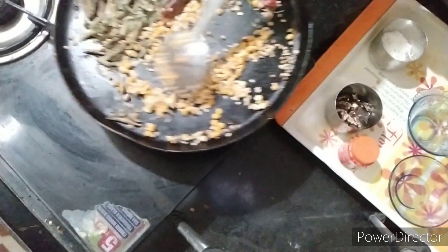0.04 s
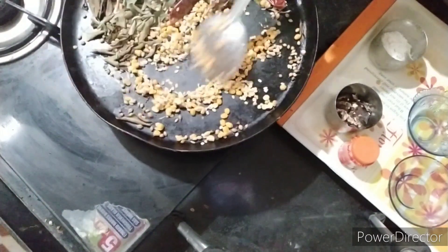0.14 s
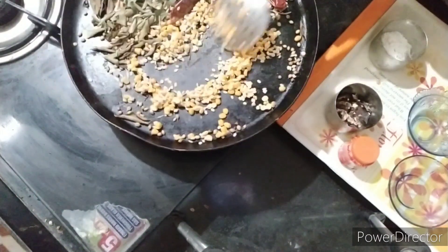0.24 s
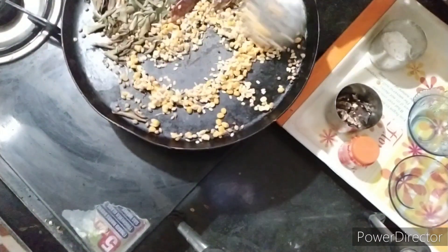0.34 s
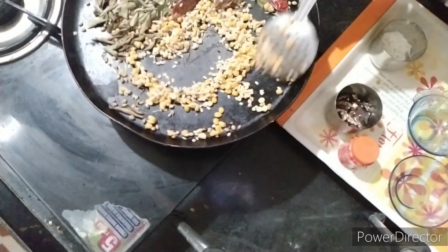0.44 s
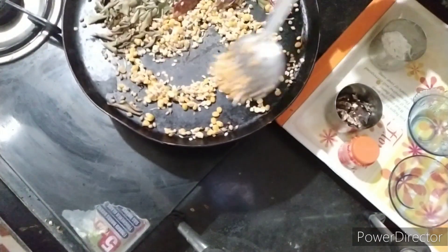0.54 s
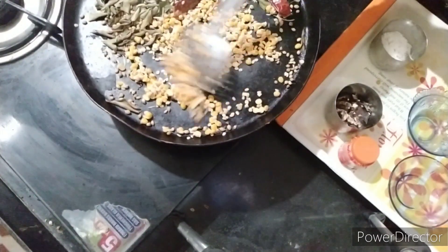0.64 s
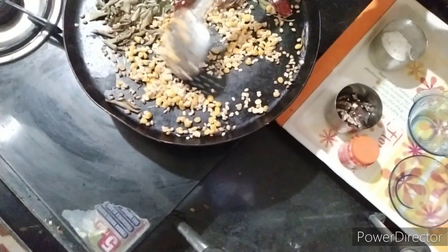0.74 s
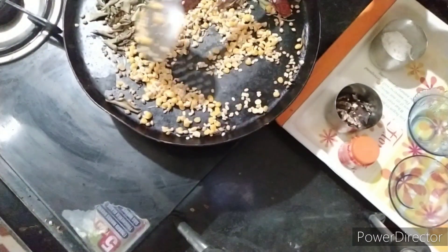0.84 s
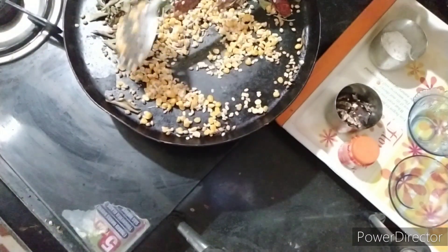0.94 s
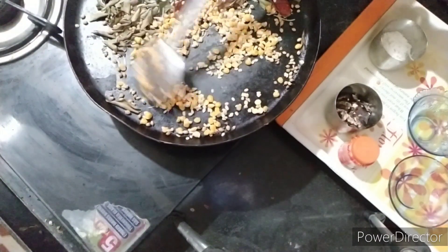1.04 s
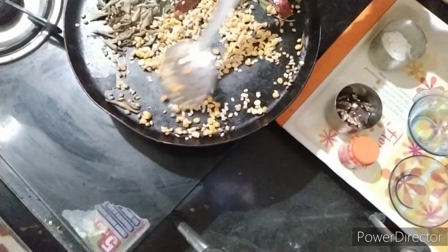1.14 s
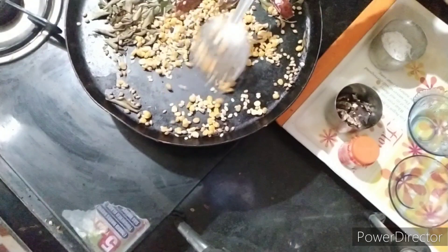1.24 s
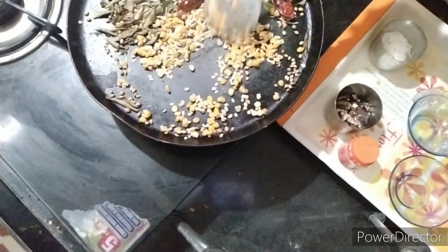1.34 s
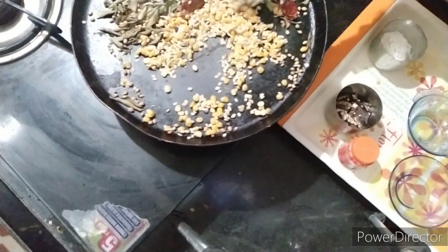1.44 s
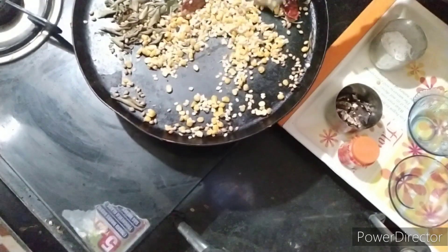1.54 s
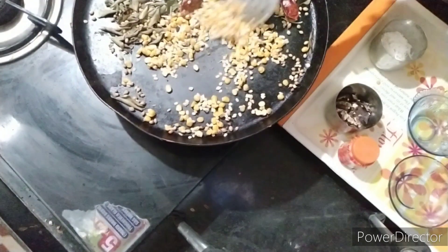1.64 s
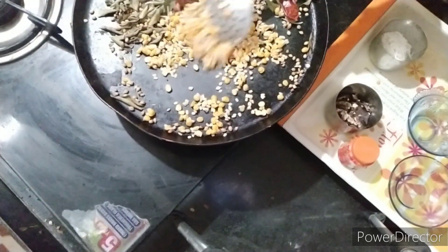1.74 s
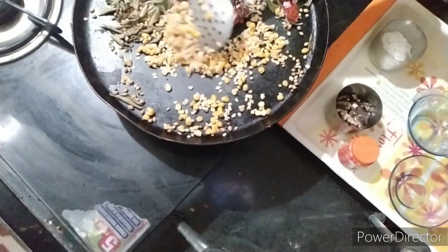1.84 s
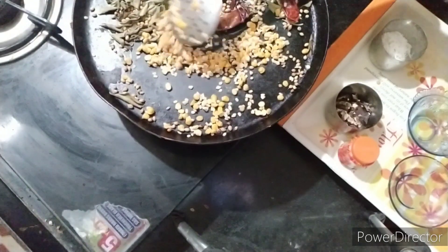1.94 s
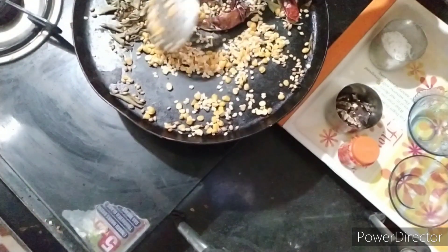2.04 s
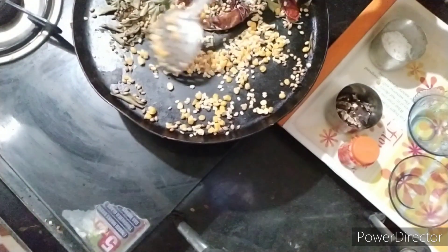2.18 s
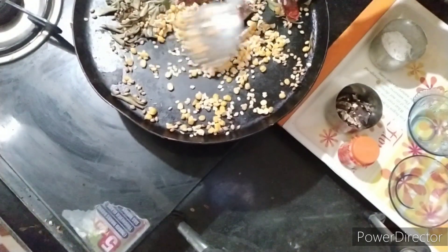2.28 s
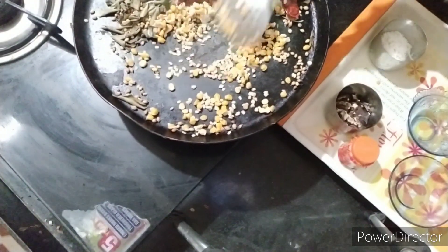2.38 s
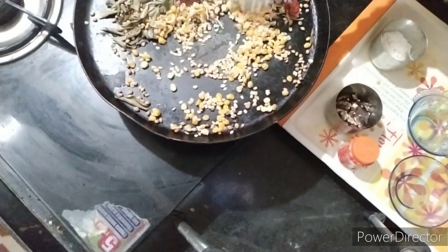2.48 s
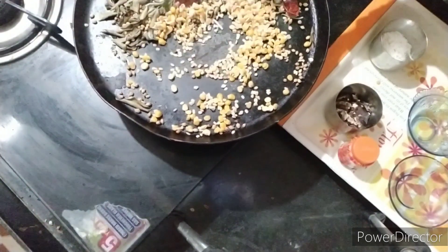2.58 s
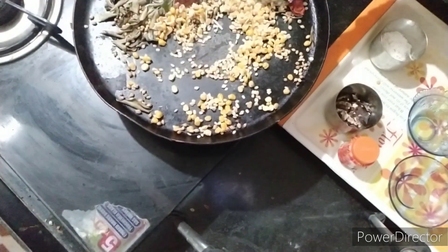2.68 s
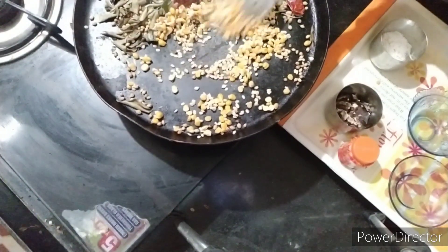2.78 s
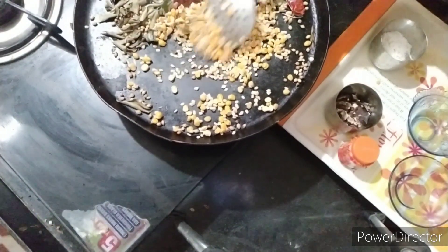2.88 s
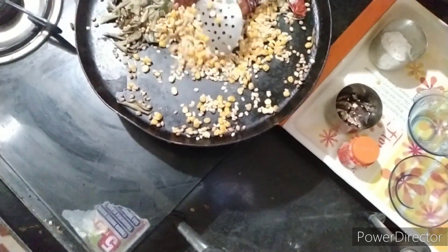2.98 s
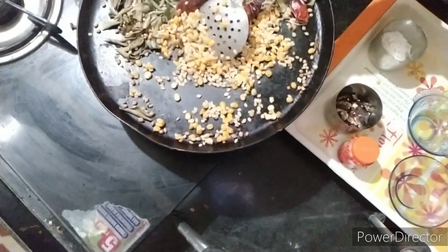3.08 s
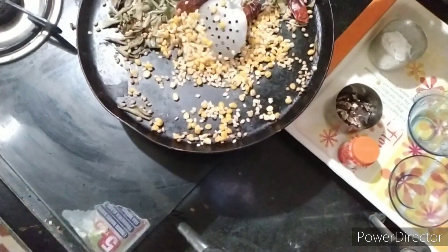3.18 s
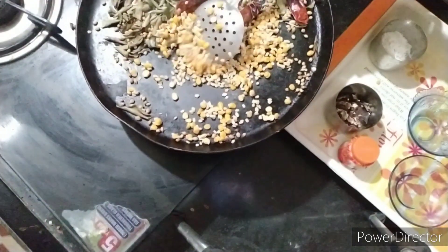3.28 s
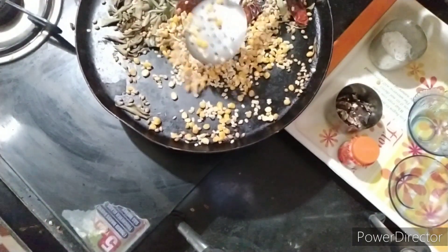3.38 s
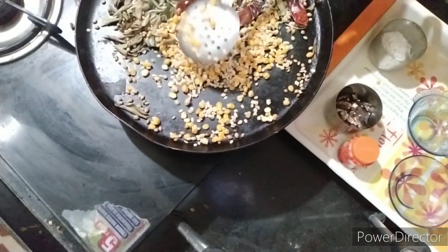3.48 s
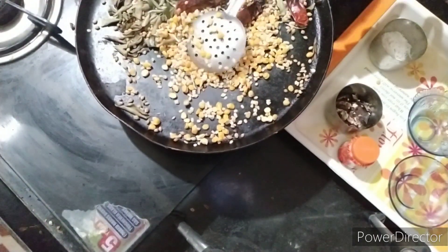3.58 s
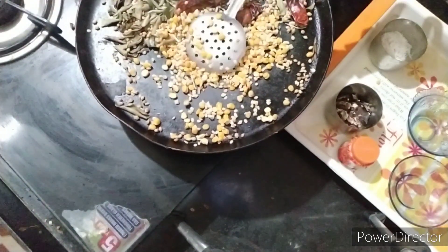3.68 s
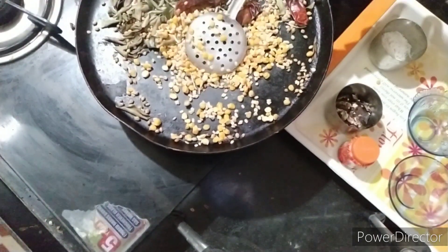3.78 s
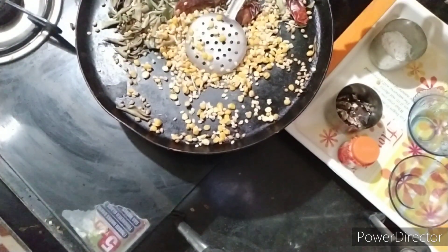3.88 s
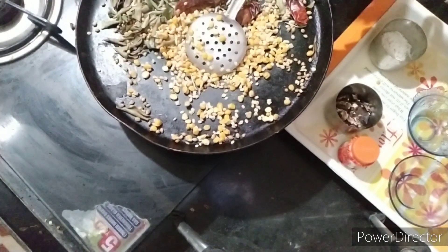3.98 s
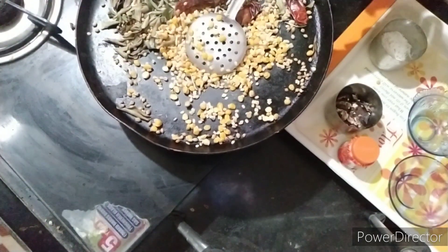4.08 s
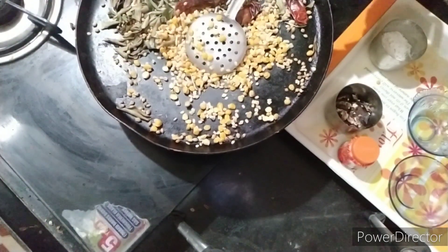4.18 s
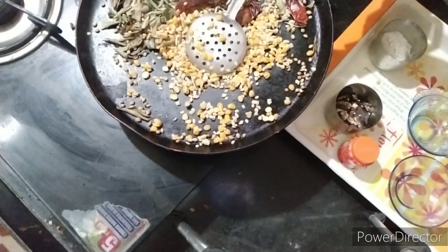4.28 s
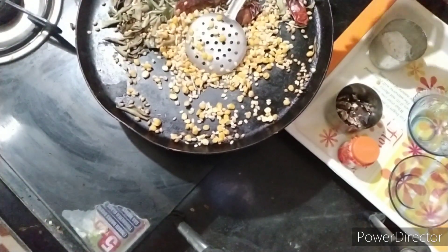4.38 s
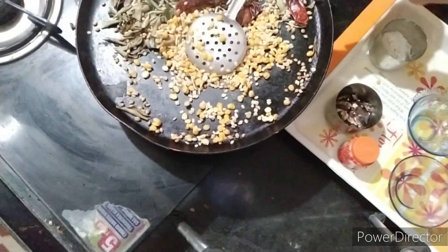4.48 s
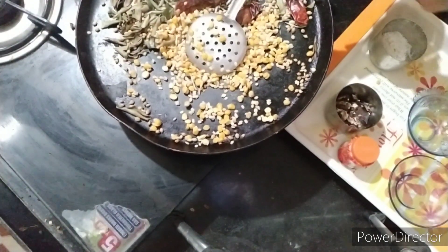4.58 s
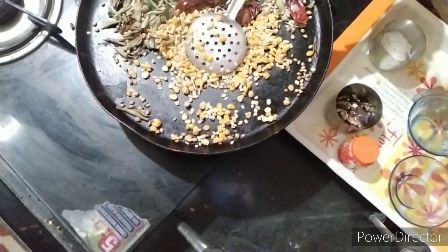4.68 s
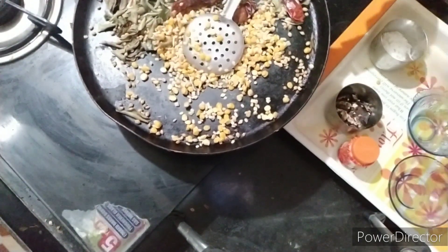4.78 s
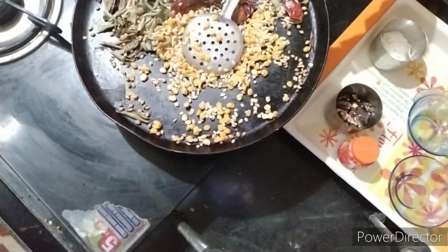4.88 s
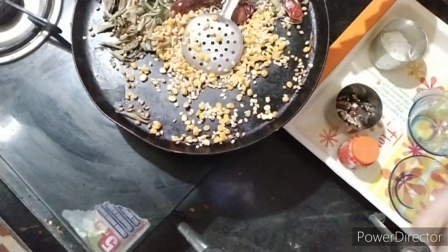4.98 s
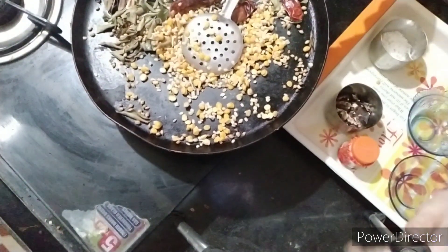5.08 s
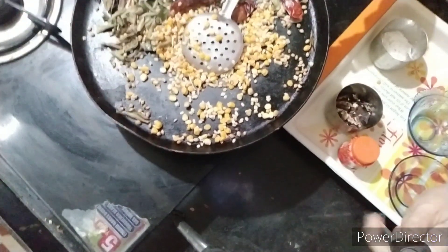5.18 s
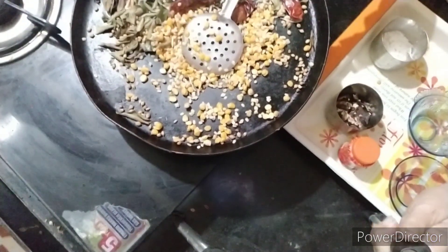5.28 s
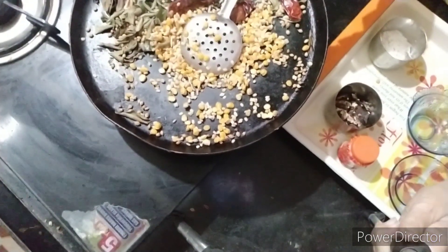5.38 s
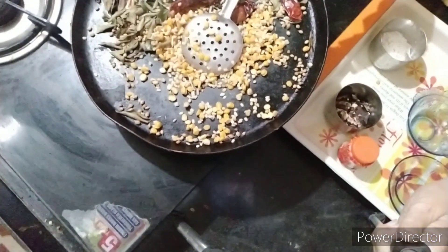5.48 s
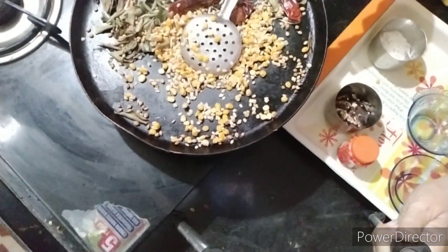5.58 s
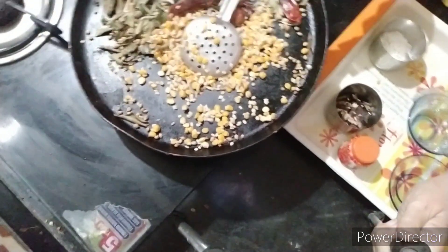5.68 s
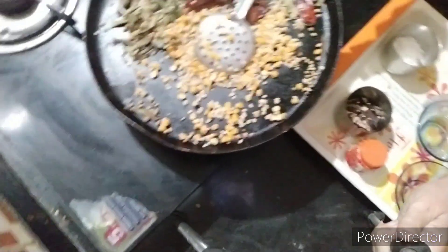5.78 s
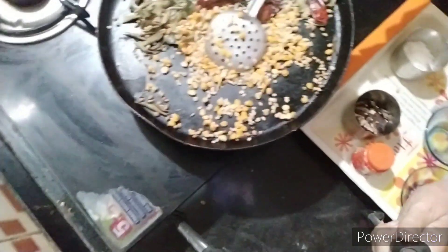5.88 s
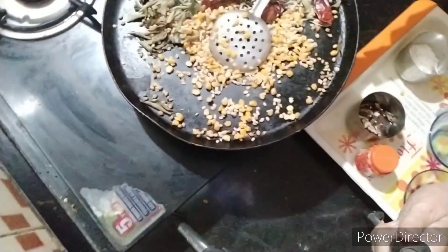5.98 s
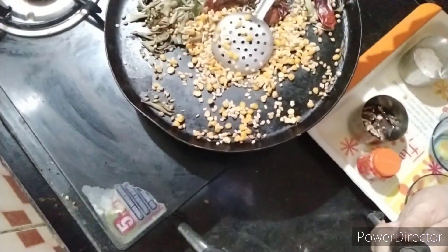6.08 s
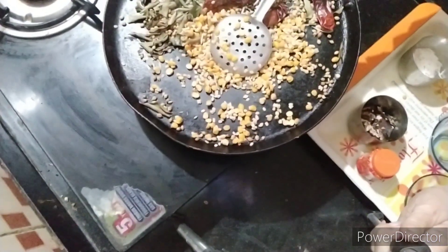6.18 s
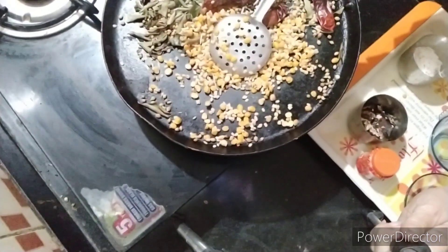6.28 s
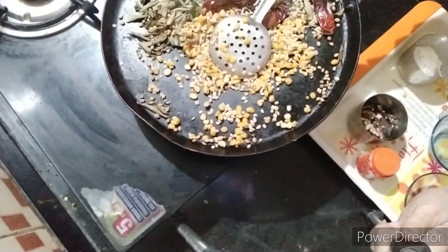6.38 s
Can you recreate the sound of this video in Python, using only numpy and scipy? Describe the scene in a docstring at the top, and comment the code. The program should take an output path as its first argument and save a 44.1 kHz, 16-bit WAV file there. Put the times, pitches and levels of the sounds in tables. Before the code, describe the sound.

Dry lentils hiss, tick and crack under a scraping metal blade on a flat pan, followed by dull thuds and clacks on a worktop.

```python
"""Stirring lentils on an iron pan

A perforated metal skimmer stirs dry lentils, leaves and chillies on a flat iron pan in a small kitchen.
Lentils rustle, tick and crack: filtered clusters of tiny random contacts and short noise bursts.
The blade scrapes and strikes the pan, once with a sharp clink, and comes to rest: decaying tones and noise.
Then things are shifted and set down beside the stove, as coloured grains, thuds and clacks.
A faint wavering hum of sine tones lies under it all, with soft noise and a short room echo."""
import sys
import numpy as np
from scipy import signal
from scipy.fft import rfft, irfft, next_fast_len
from scipy.io import wavfile
from scipy.ndimage import uniform_filter1d, map_coordinates

SR = 44100
rng = np.random.default_rng(int(sys.argv[2]) if len(sys.argv) > 2 else 0)


def file_out(sig):
    """Save sig as 16-bit WAV at sys.argv[1]."""
    # one column per channel
    cols = np.atleast_2d(sig).T
    # limit, then scale
    lim = np.clip(cols, -1, 1)
    pcm = np.round(lim * 32767).astype(np.int16)
    wavfile.write(sys.argv[1], SR, pcm)


N = 283550  # length in samples


def amp(db):
    """Decibels to gain."""
    return 10 ** (np.asarray(db) / 20)


def unit(x):
    """Scale a sound to an rms of 1."""
    return x / np.sqrt(np.mean(x ** 2) + 1e-20)


def along(points, hz):
    """Read (frequency, value) points at any frequency, on a log axis."""
    point_hz, values = np.transpose(points)
    return np.interp(np.log(hz + 1), np.log(point_hz), values)


def curves(rows):
    """Join the points of each column after the time into one value per sample."""
    times, *columns = np.transpose(rows)
    return [np.interp(np.arange(N) / SR, times, column) for column in columns]


def wobble(rate):
    """A smooth random curve with `rate` random points a second."""
    knots = rng.standard_normal(int(N * rate / SR) + 4)
    return map_coordinates(knots, [np.arange(N) * rate / SR])


def convolve(x, response):
    """Pass two channels through a response and keep their length."""
    return signal.fftconvolve(x, np.atleast_2d(response), axes=1)[:, :x.shape[1]]


def colour(x, points, size=4096):
    """Filter a sound to a spectrum, with nothing heard before its cause (minimum phase)."""
    log_gain = np.log(amp(along(points, np.fft.rfftfreq(size, 1 / SR))))
    cepstrum = irfft(log_gain)
    # folding the cepstrum onto positive times makes the filter causal
    cepstrum[1:size // 2] *= 2
    cepstrum[size // 2 + 1:] = 0
    return convolve(x, irfft(np.exp(rfft(cepstrum))))


def diffuse(n, alike_hz):
    """Noise from all sides: the two microphones agree only in the bass."""
    a, b = rfft(rng.standard_normal((2, n)))
    likeness = .9 / (1 + (np.fft.rfftfreq(n, 1 / SR) / alike_hz) ** 2)
    turn = np.arccos(likeness) / 2
    shared, opposed = a * np.cos(turn), b * np.sin(turn)
    return irfft(np.array([shared + opposed, shared - opposed]), n)


def ring(modes, spread_db=2):
    """Dying tones of a struck object, each at a random strength; high ones differ more in phase by side."""
    t = np.arange(SR // 2) / SR
    out = np.zeros((2, len(t)))
    draws = rng.standard_normal((len(modes), 3))
    for (hz, db, t60), (strength, phase, side) in zip(modes, draws):
        turn = np.array([[1], [-1]]) * side * min(hz / 2800, 1)
        decay = amp(db + spread_db * strength - 60 * t / t60)
        out += decay * np.sin(2 * np.pi * (hz * t + phase) + turn)
    return out / np.linalg.norm(out[0])


def grains(rate, spread_db, lag_s):
    """Tiny contacts of uneven size, `rate` a second, each with its own place between the microphones."""
    when, size, side, lean = rng.random((int(rate * N / SR), 4)).T
    strength = amp(spread_db * np.minimum(-np.log(1 - size), 4)) * rng.choice([-1, 1], len(when))
    lag = (2 * side - 1) * lag_s * SR / 2
    lean = lean - .5
    channels = []
    for way in (1, -1):
        at = np.round(when * N + way * lag).astype(int) % N
        channels.append(np.bincount(at, strength * (1 + way * lean), N))
    return unit(np.array(channels))


def add(track, s, sound):
    """Mix a sound in at time s."""
    at = round(s * SR)
    track[:, at:at + sound.shape[1]] += sound[:, :N - at]


def gestures(rows, rises_s, falls_db_per_s):
    """One gain curve per level column: every gesture sets in, holds for its length and dies away."""
    t = np.arange(N) / SR
    power = np.zeros((len(rises_s), N))
    for s, length, *levels in rows:
        near = (t > s - .2) & (t < s + length + .8)
        age = t[near] - s
        after = np.maximum(age - length, 0)
        for layer, db, rise, fall in zip(power, levels, rises_s, falls_db_per_s):
            # the S-shaped rise is almost complete at the listed time
            onset = 1 / (1 + np.exp(-4 * (2 * age / rise + 1)))
            layer[near] += onset * amp(db - fall * after) ** 2
    return np.sqrt(power)


# rms depth of the random gains, and the width and time they are smoothed over
BLOTCH_DB, BLOTCH_WIDTH_HZ, BLOTCH_S = 3.5, 260, .03


def blotchy(x):
    """Random gains, smoothed over frequency and time, make the texture blotchy."""
    hz, t, z = signal.stft(x, SR, nperseg=512)
    field = rng.standard_normal(z.shape[1:])
    field = uniform_filter1d(field, round(BLOTCH_WIDTH_HZ / hz[1]), 0)
    field = uniform_filter1d(field, round(BLOTCH_S / t[1]), 1)
    patchy = signal.istft(z * amp(BLOTCH_DB * unit(field)), SR, nperseg=512)[1]
    return unit(patchy[:, :N])


def at_level(sound, db):
    """Scale a blow to db over its first 20 ms."""
    return amp(db) * sound / np.std(sound[:, :SR // 50])


def blow(modes, spectrum, ring_db, attack_s, contact_t60, wash_db, wash_t60):
    """A blow as brief contact noise, ringing modes, and a longer noise wash for dense weak modes."""
    t = np.arange(SR // 2) / SR
    rise = (1 - np.exp(-t / attack_s)) ** 2
    fall = amp(-60 * t / contact_t60) + amp(wash_db - 60 * t / wash_t60)
    contact = colour(diffuse(len(t), 550) * rise * fall, spectrum)
    return contact / np.linalg.norm(contact[0]) + amp(ring_db) * rise * ring(modes)


def grain_ping(hz, t60):
    """One hard grain: a snap of noise and a brief ring at two unrelated pitches."""
    t = np.arange(SR // 30) / SR
    first, second = rng.random((2, 2, 1))  # starting phases
    tone = np.sin(2 * np.pi * (hz * t + first))
    tone = tone + .5 * np.sin(2 * np.pi * (hz * rng.uniform(1.2, 1.9) * t + second))
    snap = 1.5 * rng.standard_normal((2, len(t))) * amp(-60 * t / .007)
    return tone * amp(-60 * t / t60) + snap


# tones of the hum, before they waver: (frequency [Hz], level [dB])
HUM_TONES = [(160, -67), (296, -75), (442, -81.5)]
# colour of the soft rush: (frequency [Hz], relative level [dB per Hz])
RUSH_COLOUR = [(25, -1), (60, -3.5), (120, -14), (165, -10.5), (350, -14.5), (600, -16.5), (1200, -26),
               (2500, -30), (4500, -31), (7500, -29.5), (9800, -28.5), (12000, -29.5), (15500, -55)]


def background():
    """The still kitchen: a soft rush of noise and a hum of sines that waver in level and phase."""
    t = np.arange(N) / SR
    hum = np.zeros(N)
    for hz, db in HUM_TONES:
        level = amp(db + 2.3 * wobble(6.0)) * np.sqrt(2)
        hum += level * np.sin(2 * np.pi * hz * t + 0.54 * wobble(4.4))
    rush = amp(-59) * unit(colour(diffuse(N, 900), RUSH_COLOUR))
    return hum + rush


# how long the room echo takes to fall by 60 dB: (frequency [Hz], decay time [s])
ROOM_DECAY = [(150, 0.4), (600, 0.28), (3500, 0.31), (9500, 0.3), (15000, 0.14)]


def kitchen(x):
    """Hard near walls answer with a short, bright tail of decaying noise."""
    hz, t, z = signal.stft(diffuse(SR // 2, 980), SR, nperseg=256)
    decay = amp(-60 * t / along(ROOM_DECAY, hz)[:, None])
    tail = signal.istft(z * decay, SR, nperseg=256)[1]
    tail = np.pad(tail, ((0, 0), (SR // 250, 0)))  # the answer comes 4 ms late
    return convolve(x, tail / np.linalg.norm(tail[0]))


# things set down on the worktop; a soft landing gives a dull thud, a hard one a clack too:
# (time [s], thud level [dB], thud cut-off [Hz], clack level [dB], ring against contact noise [dB])
SET_DOWNS = [(3.869, -60, 900, -50, -18), (4.065, -44.5, 1330, -58, -8.5), (4.226, -69, 1400, -49.5, -28),
             (4.484, -48.5, 650, -61, -6), (4.576, -42, 550, -56, -2), (4.591, -36.5, 756, -37.5, -7.5),
             (4.7052, -33, 1700, -42, -8), (4.846, -41.5, 1080, -65, -1.5), (5.32, -59.5, 900, -68, -14.5),
             (5.341, -57.5, 400, -77.5, -14), (5.857, -43.5, 1190, -69, -6.5), (5.886, -60, 900, -66, -12),
             (5.933, -51, 910, -67, -6), (6.311, -57, 1000, -49.5, -9), (6.341, -54.5, 900, -54, -8)]
# tones of the worktop: (frequency [Hz], relative level [dB], time to fall 60 dB [s])
WORKTOP_MODES = [(338, -8, .18), (407, 0, .2), (445, -3, .13), (478, -3, .18), (697, -1, .22),
                 (860, -2, .2), (962, -1, .24), (1030, -2, .18), (1280, -8, .15)]
# tones of a container: (frequency [Hz], relative level [dB], time to fall 60 dB [s])
CONTAINER_MODES = [(1275, -4, .18), (1523, -1, .17), (1675, -2, .16), (1925, -3, .16), (2172, -4, .15),
                   (2500, -3, .22), (3105, -4, .22), (3400, -8, .14)]
# colour of the contact on the worktop: (frequency [Hz], relative level [dB per Hz])
THUD_COLOUR = [(60, -16), (230, -8.5), (330, -5.5), (450, 3), (550, -4), (690, -1), (1000, -3), (1300, -4),
               (2200, -8), (5000, -24), (12000, -26.5)]
# colour of the contact on a container: (frequency [Hz], relative level [dB per Hz])
CLACK_COLOUR = [(400, -28), (1000, -9), (1350, -2.5), (1700, -2), (2200, 1), (3100, -2), (3700, -6),
                (6500, -9.5), (9500, -9.5), (12000, -25), (16000, -49)]


def knocks():
    """The worktop thuds, each with its own dullness, and the container that lands on it clacks."""
    out = np.zeros((2, N))
    for s, thud_db, cutoff_hz, clack_db, ring_db in SET_DOWNS:
        thud = blow(WORKTOP_MODES, THUD_COLOUR, ring_db,
                    attack_s=.0011, contact_t60=.034, wash_db=-15, wash_t60=.21)
        thud = signal.sosfilt(signal.butter(2, cutoff_hz, fs=SR, output="sos"), thud)
        clack = blow(CONTAINER_MODES, CLACK_COLOUR, ring_db,
                     attack_s=.0006, contact_t60=.02, wash_db=-21, wash_t60=.18)
        add(out, s, at_level(thud, thud_db) + at_level(clack, clack_db))
    return out


# things shifted beside the stove: (time [s], length [s], dull slide level [dB], dry scuff level [dB])
SHIFT_MOVES = [(3.875, 0.013, -79, -58.5), (4.24, 0.083, -66, -58.5), (4.915, 0.026, -52, -59),
               (5.735, 0.058, -56.5, -72), (5.835, 0.024, -55, -64), (5.92, 0.025, -56, -50),
               (6.04, 0.11, -58.5, -57), (6.17, 0.065, -54.5, -73), (6.268, 0.018, -63, -58),
               (6.322, 0.016, -64.5, -44), (6.41, 0.03, -78, -61)]
# colour of a dull slide: (frequency [Hz], relative level [dB per Hz])
SLIDE_COLOUR = [(100, -23.5), (250, -8.5), (440, 3.5), (660, -2.5), (900, -4), (1600, -14.5), (4000, -43)]
# colour of a dry scuff on the worktop: (frequency [Hz], relative level [dB per Hz])
SCUFF_COLOUR = [(400, -16.5), (650, 4), (1100, -1.5), (1600, 3.5), (2050, 5), (2700, 3.5), (3700, -8),
                (5000, -7.5), (6200, -15), (9500, -22.5), (14000, -33.5)]
SHIFT_RISE_S, SHIFT_FALL_DB_PER_S = 0.023, 139  # how a shift starts and dies away


def beside_stove():
    """Containers slide and scuff as streams of tiny contacts, and knock on the worktop."""
    sliding, scuffing = gestures(SHIFT_MOVES, [SHIFT_RISE_S] * 2, [SHIFT_FALL_DB_PER_S] * 2)
    slide = unit(colour(grains(rate=450, spread_db=2.5, lag_s=0.00093), SLIDE_COLOUR))
    rough = grains(rate=1300, spread_db=2.5, lag_s=0.00028) * amp(2 * wobble(90))
    scuff = blotchy(colour(rough, SCUFF_COLOUR))
    return sliding * slide + scuffing * scuff + knocks()


# light clicks, mostly lentils on metal, one (4.224 s) with a knock on the worktop:
# (time [s], level [dB])
LIGHT_CLICKS = [(0.4266, -34), (0.434, -32), (0.486, -29.5), (0.5194, -29.5), (0.532, -29.5),
                (0.5777, -29.5), (0.619, -31.5), (0.696, -39), (1.865, -41), (1.889, -35), (2.1368, -44),
                (2.143, -36.5), (2.2002, -41.5), (2.2518, -38.5), (2.6767, -32), (2.97, -48), (3.3765, -36),
                (3.5584, -40.5), (3.5744, -45), (3.59, -36), (3.639, -40), (3.7144, -43.5), (3.8067, -36),
                (4.224, -48), (6.297, -42), (6.309, -49)]
# colour of a light click: (frequency [Hz], relative level [dB per Hz])
CLICK_COLOUR = [(1000, -15.5), (3000, -24), (7000, -3.5), (9600, 13), (12000, 3), (15500, -7.5)]


def light_clicks():
    """Light clicks, mostly lentils on metal: noise bursts that fade by 60 dB in 10 ms."""
    out = np.zeros((2, N))
    t = np.arange(SR // 20) / SR
    envelope = (1 - np.exp(-t / 0.00057)) * amp(-60 * t / 0.01)
    for s, db in LIGHT_CLICKS:
        click = colour(rng.standard_normal((2, len(t))) * envelope, CLICK_COLOUR)
        add(out, s, amp(db) * click / np.std(click[:, :SR // 250]))  # level over the first 4 ms
    return out


# a lentil cracks or snaps out from under the blade: (time [s], level [dB], pitch [Hz])
LENTIL_CRACKS = [(0.287, -42, 2300), (0.764, -37.5, 2000), (0.788, -36.5, 1950), (0.806, -34.5, 1910),
                 (1.232, -36.5, 4650), (1.345, -45.5, 2210), (1.381, -44, 2550), (1.889, -43.5, 2800),
                 (2.321, -37, 2680), (2.523, -45.5, 1400), (2.897, -41.5, 2850), (2.971, -45.5, 3600)]


def cracks():
    """The loudest of the lentils caught under the blade: a snap and a brief ring each."""
    out = np.zeros((2, N))
    for s, db, hz in LENTIL_CRACKS:
        ping = grain_ping(hz, t60=.018)
        add(out, s, amp(db) * ping / np.std(ping[:, :SR // 150]))  # level over the first 7 ms
    return out


# the pressed blade drones briefly as it drags; the level is the one before the ends are faded:
# (time [s], length [s], first pitch [Hz], last pitch [Hz], level [dB])
BLADE_DRONES = [(0.103, 0.11, 642, 592, -48), (0.245, 0.09, 298.6, 283, -42), (0.249, 0.075, 478, 450, -40),
                (0.703, 0.067, 406, 468, -40), (1.39, 0.12, 482, 493, -50.5), (1.577, 0.065, 420, 368, -50),
                (2.021, 0.059, 485, 420, -51), (2.411, 0.081, 616, 613, -54),
                (2.507, 0.21, 367, 328, -56.5), (3.16, 0.113, 486, 458, -51)]


def drones():
    """Stick and slip feed one narrow resonance, which shifts with the pressure on the blade."""
    out = np.zeros((2, N))
    for s, length, first_hz, last_hz, db in BLADE_DRONES:
        n = int(length * SR)
        phase = 2 * np.pi * np.cumsum(np.geomspace(first_hz, last_hz, n)) / SR
        # two random curves make the tone flutter like narrow noise
        tone = unit(wobble(87.5)[:n] * np.cos(phase) + wobble(83.3)[:n] * np.sin(phase))
        faded = tone * signal.windows.tukey(n, .5)
        add(out, s, amp(db) * faded[None])
    return out


# the skimmer strikes the pan; a free blade rings, a pressed one is damped
# (the row at 1.1895 s is no strike but a faint lead-in to the sharp clink at 1.192 s):
# (time [s], thud level [dB], body level [dB], bite level [dB], treble level [dB],
#  ring against contact noise [dB])
PAN_STRIKES = [(0.067, -46, -52, -59, -63, -11), (0.212, -47, -41.5, -51, -45, -11),
               (0.224, -39.5, -38, -52, -42.5, -1), (0.263, -37.5, -41.5, -50, -55, -12),
               (0.323, -53, -42.5, -58, -62, -20), (0.547, -46.5, -42, -48.5, -43, -2.5),
               (0.601, -43, -37, -37.5, -43, -20), (0.696, -54, -37.5, -39.5, -38.5, -13),
               (0.738, -47, -38, -49, -52, -5), (0.755, -50, -39.5, -39.5, -45, -8),
               (0.778, -39.5, -30.5, -36.5, -41.5, -5.5), (0.856, -41, -37.5, -44.5, -51.5, -21),
               (1.1895, -66, -43, -53, -39.5, -14), (1.192, -29.5, -24, -26.5, -17, -15),
               (1.209, -48, -43, -34, -41, -4), (1.218, -50, -43, -41, -33.5, -9),
               (1.454, -55, -47, -50, -56.5, -8), (1.662, -70, -67, -42.5, -36, -4.5),
               (2.27, -53, -52, -52.5, -43, -3), (2.3025, -39.5, -33.5, -34.5, -31, -12.5),
               (2.781, -61, -44.5, -39, -35, -20), (3.108, -47, -38.5, -45.5, -58, -19),
               (3.213, -50, -46.5, -41, -39.5, -10), (3.543, -62, -62, -62.5, -55.5, -16)]
# tones of the pan: (frequency [Hz], relative level [dB], time to fall 60 dB [s])
PAN_MODES = [(296, -12, .3), (447, -7, .27), (478, -6, .25), (571, -7, .26), (598, -3, .25), (722, -3, .22),
             (866, 1, .25), (1068, -1, .24), (1125, -4, .24), (1281, -8, .2), (1410, -9, .25),
             (1922, -5, .22), (1962, -5, .22), (2136, -8, .3), (2687, -6, .22), (2816, -7, .2)]
# tones of the skimmer: (frequency [Hz], relative level [dB], time to fall 60 dB [s])
SKIMMER_MODES = [(4048, -11, .28), (5744, -11, .28), (5905, -10, .25), (6327, -9, .25), (6828, -6, .26),
                 (7153, -11, .28), (8231, -9, .2), (8455, -10, .3), (9278, -7, .25), (9345, -6, .22),
                 (9557, -6, .16), (9621, -2, .22), (9674, -2, .24)]
# colour of the contact on the pan: (frequency [Hz], relative level [dB per Hz])
CLINK_COLOUR = [(60, -30.5), (200, -10), (320, -15.5), (480, 1), (800, 6), (1300, 0), (2000, 1.5),
                (2700, 5), (3500, -3.5), (5500, -0.5), (7000, 2), (8200, 2.5), (9600, 7.5), (11000, 0),
                (13000, -11.5), (16000, -22.5)]


def skimmer_strikes():
    """Blade meets pan and both ring; the spot and the hardness of the blow weight its registers."""
    out = np.zeros((2, N))
    bands_hz = [(110, 720), (720, 1500), (1500, 3500), (3500, 15500)]  # thud, body, bite, treble
    registers = [signal.butter(3, edges, "band", fs=SR, output="sos") for edges in bands_hz]
    for s, *levels, ring_db in PAN_STRIKES:
        sound = blow(PAN_MODES + SKIMMER_MODES, CLINK_COLOUR, ring_db,
                     attack_s=.0015, contact_t60=.019, wash_db=-29, wash_t60=.22)
        for register, db in zip(registers, levels):
            add(out, s, at_level(signal.sosfilt(register, sound), db))
    return out


# colour of whole lentils caught under the blade: (frequency [Hz], relative level [dB per Hz])
CRUNCH_COLOUR = [(500, -19), (1000, -1.5), (2000, 0.5), (2900, 6.5), (3900, -8), (6000, 9.5), (9600, 10.5),
                 (13000, -15.5)]
CRUNCH_PER_S, CRUNCH_T60_S = 85, .03  # ticks a second, time for the ring of one to fall 60 dB


def crunch():
    """Coarse, separate ticks at uneven gaps; every grain has its own pitch."""
    out = np.zeros((2, N))
    for when, pitch, size in rng.random((int(CRUNCH_PER_S * N / SR), 3)):
        hz = np.exp(np.interp(pitch, [0, 1], np.log([1100, 6500])))
        add(out, when * N / SR, amp(16 * size) * grain_ping(hz, CRUNCH_T60_S))
    return unit(colour(out, CRUNCH_COLOUR))


# pushes of the skimmer through the heap:
# (time [s], length [s], lentil rustle level [dB], blade scrape level [dB], pan rub level [dB])
SKIMMER_PUSHES = [(0.0, 0.015, -44, -61, -65), (0.075, 0.12, -47.5, -53, -41.5),
                  (0.21, 0.033, -40, -53, -49), (0.265, 0.022, -51, -46.5, -38),
                  (0.435, 0.15, -41, -75, -55), (0.625, 0.054, -42.5, -43.5, -54),
                  (0.715, 0.013, -44, -42, -45), (0.765, 0.017, -40, -38.5, -46),
                  (1.25, 0.05, -41, -50, -65), (1.36, 0.018, -41.5, -38, -44.5),
                  (1.44, 0.0069, -64, -69, -47.5), (1.54, 0.03, -51.5, -65, -56),
                  (1.598, 0.032, -48, -53, -42.5), (1.785, 0.13, -41, -48.5, -62.5),
                  (2.03, 0.03, -53, -82, -57), (2.2, 0.038, -63.5, -88, -61),
                  (2.385, 0.05, -45.5, -52.5, -66.5), (2.485, 0.12, -40, -51, -57),
                  (2.69, 0.11, -41.5, -68, -64.5), (2.88, 0.082, -39, -48.5, -66.5),
                  (3.11, 0.014, -41, -58, -47), (3.172, 0.03, -67, -58, -49),
                  (3.235, 0.034, -43.5, -50, -47), (3.56, 0.018, -78, -52.5, -56),
                  (3.78, 0.031, -52.5, -81, -71)]
# lentils left to roast crackle faintly; levels between the points are joined up: (time [s], level [dB])
ROASTING_LEVEL = [(3.5, -87), (4.15, -56), (4.6, -68), (4.95, -60), (5.25, -69), (5.6, -68.5), (5.9, -61.5)]
# colour of tumbling lentils: (frequency [Hz], relative level [dB per Hz])
RUSTLE_COLOUR = [(1000, -38), (2500, -17.5), (4500, -16.5), (7000, -13), (8500, -5), (9600, -1.5),
                 (11000, -4.5), (12500, -15), (15500, -17)]
# colour of the scraping blade: (frequency [Hz], relative level [dB per Hz])
SCRAPE_COLOUR = [(400, -26), (800, 2.5), (1200, -3), (1600, -2), (1980, 2.5), (2750, -2), (3800, -4.5),
                 (5500, -5), (8000, -9), (13000, -31.5)]
# colour of the rubbed pan: (frequency [Hz], relative level [dB per Hz])
RUB_COLOUR = [(50, -25), (85, -3), (130, -16.5), (230, -3.5), (320, -2), (450, 3), (650, -0.5), (900, -4),
              (1400, -13.5), (3000, -33.5)]
TUMBLE_RISE_S, SCRAPE_RISE_S, RUB_RISE_S = 0.056, 0.019, 0.052  # the blade takes this long to bite
# after a push the lentils roll on longest
SETTLE_DB_PER_S, SCRAPE_FALL_DB_PER_S, RUB_FALL_DB_PER_S = 53.5, 184, 202
CRUNCH_UNDER_HEAP_DB, CRUNCH_UNDER_BLADE_DB = -11, -4  # against the rustle and the scrape gains


def stirring():
    """Lentils tumble ahead of the blade, which sticks and slips over the iron and sets the pan ringing."""
    tumble, drag, press = gestures(SKIMMER_PUSHES, [TUMBLE_RISE_S, SCRAPE_RISE_S, RUB_RISE_S],
                                   [SETTLE_DB_PER_S, SCRAPE_FALL_DB_PER_S, RUB_FALL_DB_PER_S])
    roasting_db = curves(ROASTING_LEVEL)[0]
    judder = wobble(70)

    clumps = amp(1.6 * wobble(45) + 1.6 * wobble(220))
    lentils = blotchy(colour(clumps * grains(rate=4400, spread_db=1.5, lag_s=.0003), RUSTLE_COLOUR))
    # a few lentils hop out of the heap and click on bare metal
    hops = unit(colour(grains(rate=110, spread_db=3, lag_s=.0003), CLICK_COLOUR))
    lentils += amp(-9) * hops

    slips = grains(rate=550, spread_db=2, lag_s=.0003)
    ringing_slips = slips + amp(-18) * convolve(slips, ring(PAN_MODES + SKIMMER_MODES))
    blade = blotchy(colour(ringing_slips, SCRAPE_COLOUR))

    bumps = grains(rate=600, spread_db=3, lag_s=0.00028)
    ringing_bumps = bumps + amp(-23) * convolve(bumps, ring(PAN_MODES))
    pan = blotchy(colour(ringing_bumps, RUB_COLOUR))

    rustle = np.hypot(tumble, amp(roasting_db)) * amp(1.08 * judder) * lentils
    scrape = drag * amp(2.5 * judder) * blade
    rub = press * amp(0.27 * judder) * pan
    caught_gain = np.hypot(tumble * amp(CRUNCH_UNDER_HEAP_DB), drag * amp(CRUNCH_UNDER_BLADE_DB))
    return rustle + scrape + caught_gain * crunch() + rub


def scene():
    """Pan and worktop, heard directly and through the room, over the still kitchen."""
    beside = beside_stove()
    clicks = light_clicks() + cracks()
    strikes = skimmer_strikes()
    stir = stirring() + drones()
    room = kitchen(amp(-3.0) * stir + amp(-1) * clicks + amp(-3.5) * strikes + amp(-5.0) * beside)
    return background() + room + beside + clicks + strikes + stir


# how the two microphones differ: (frequency [Hz], left minus right [dB])
MICROPHONE_BALANCE = [(60, -2), (200, -2.5), (700, -1), (1400, 0), (4400, 0), (8500, -4), (11000, 1),
                      (14000, 1.5)]
TOP_HZ = 15900  # band limit


def record(dry):
    """Two slightly unlike microphones; nothing is kept above the band limit."""
    m = next_fast_len(N + SR // 2)
    hz = np.fft.rfftfreq(m, 1 / SR)
    sides = amp(np.array([[.5], [-.5]]) * along(MICROPHONE_BALANCE, hz))
    return irfft(rfft(dry, m) * sides * (hz < TOP_HZ), m)[:, :N]


dry = scene()
out = record(dry)
file_out(out)
```